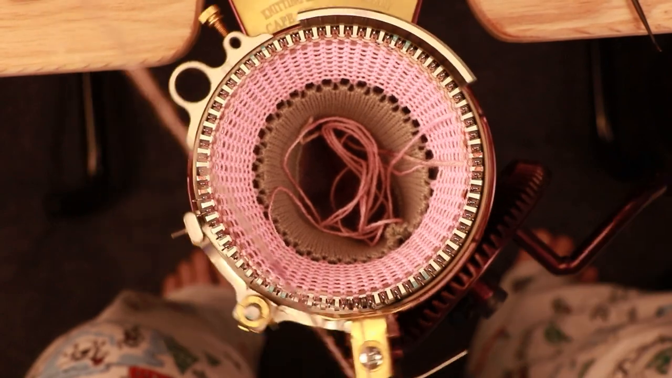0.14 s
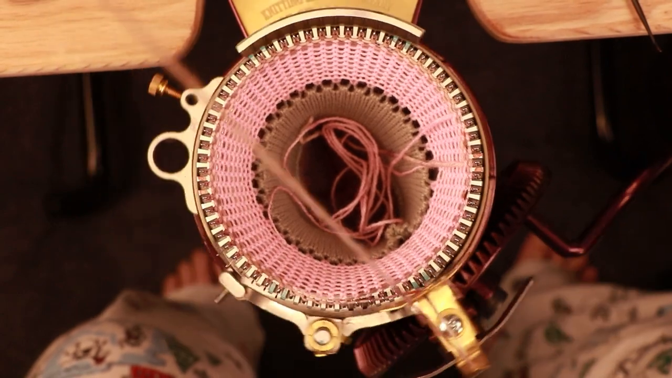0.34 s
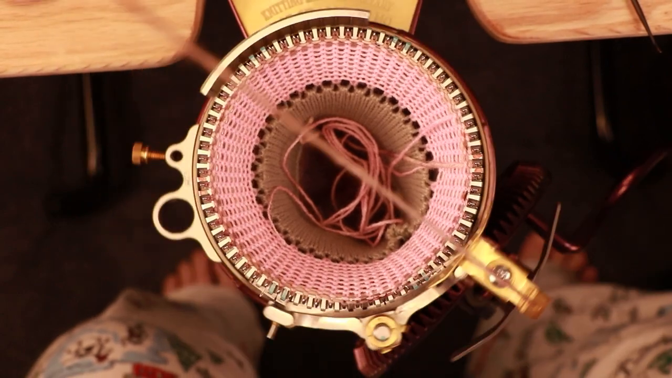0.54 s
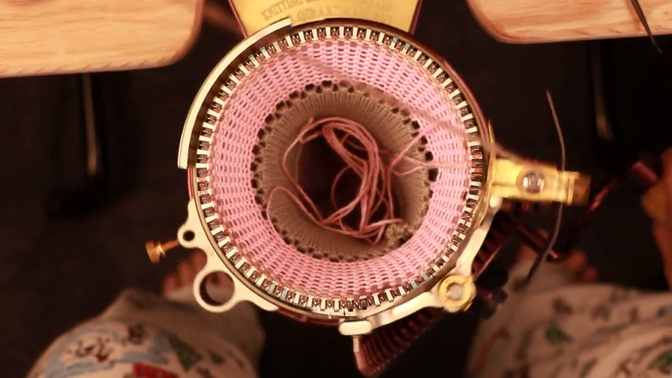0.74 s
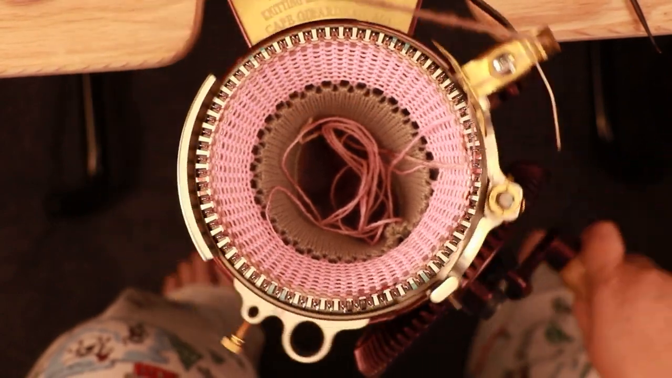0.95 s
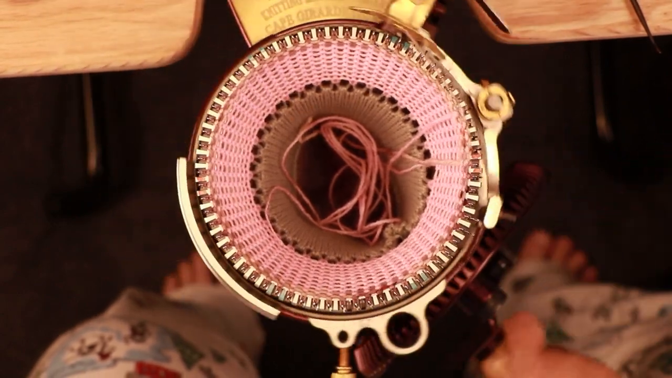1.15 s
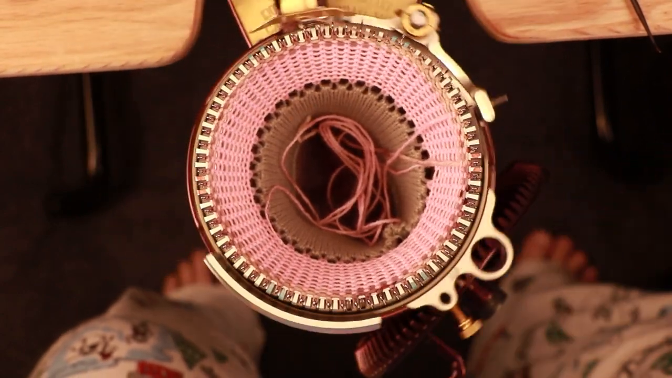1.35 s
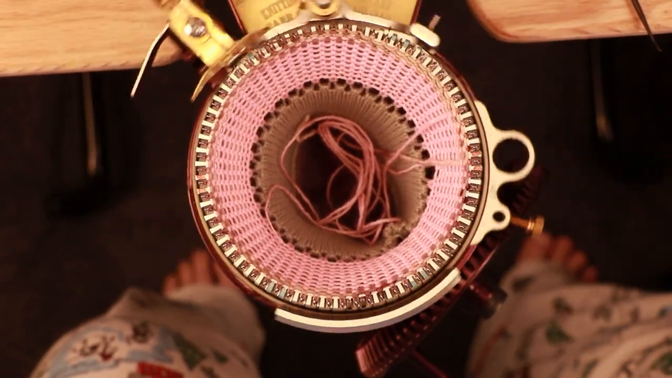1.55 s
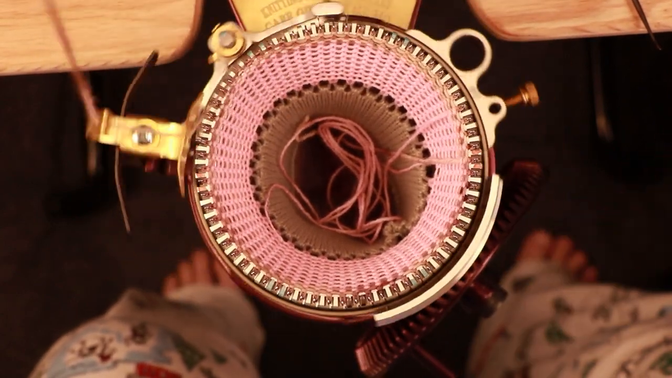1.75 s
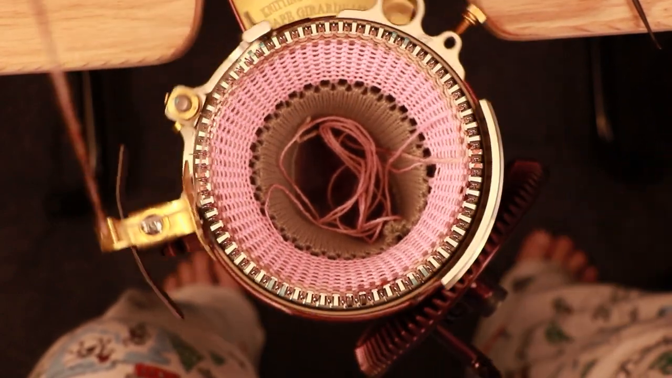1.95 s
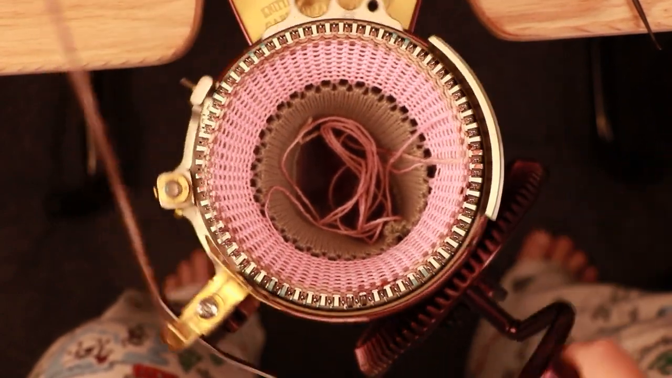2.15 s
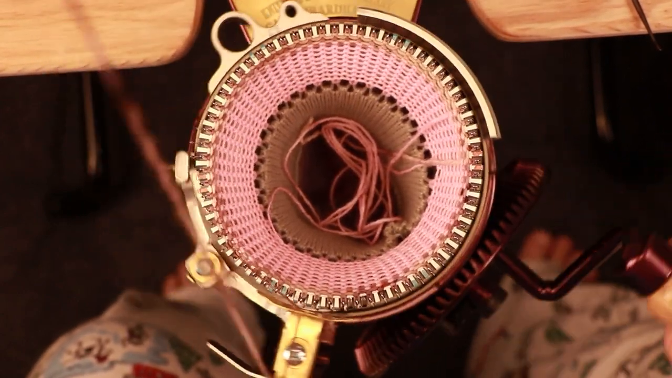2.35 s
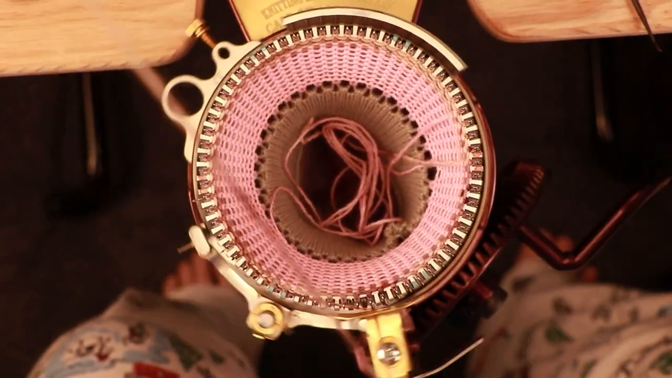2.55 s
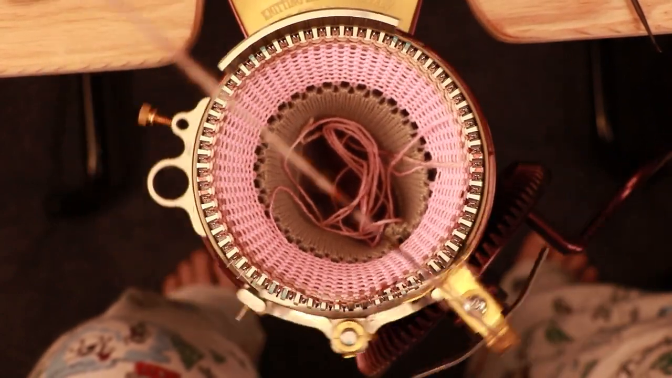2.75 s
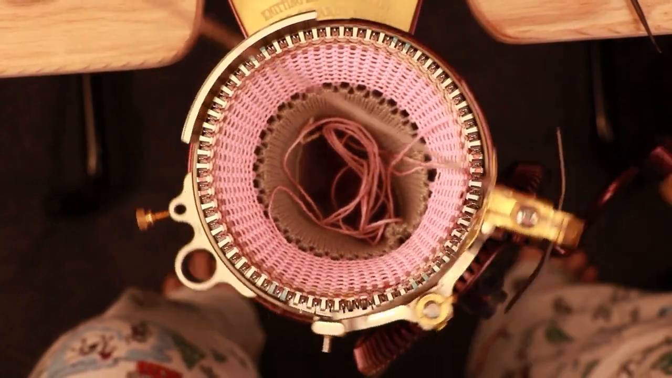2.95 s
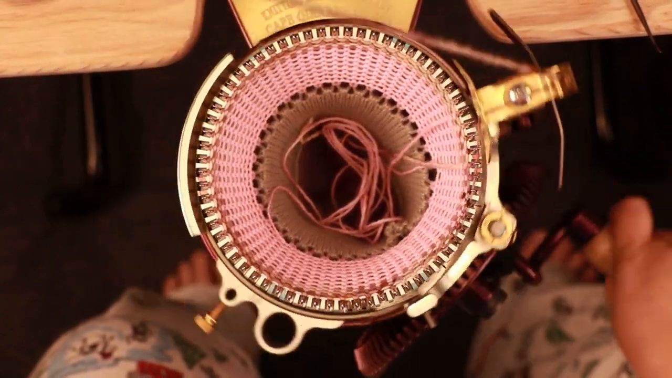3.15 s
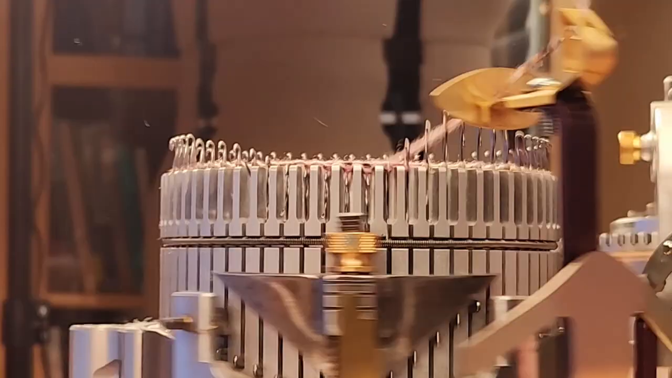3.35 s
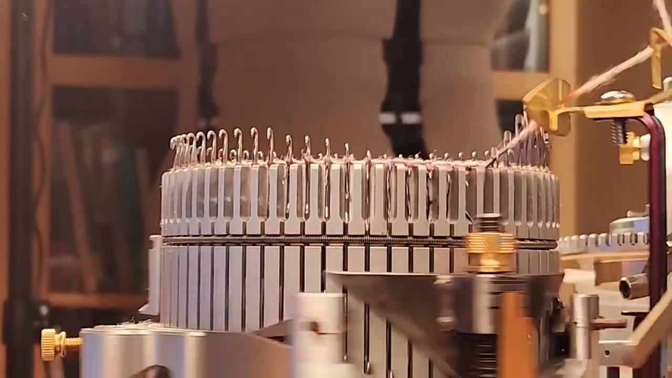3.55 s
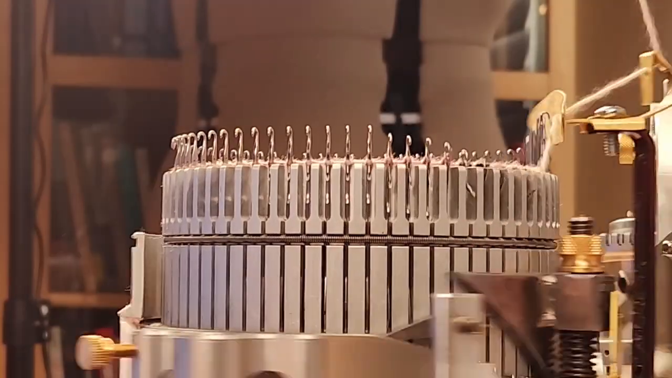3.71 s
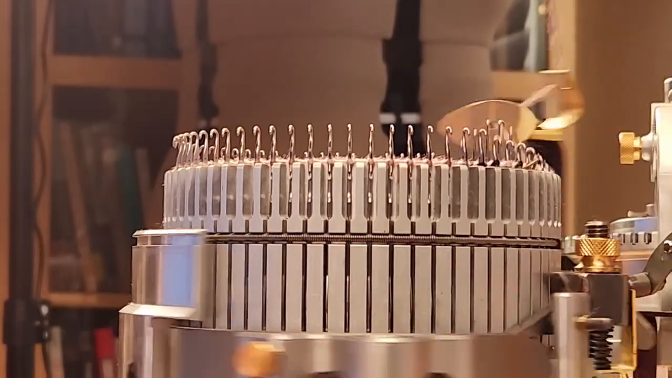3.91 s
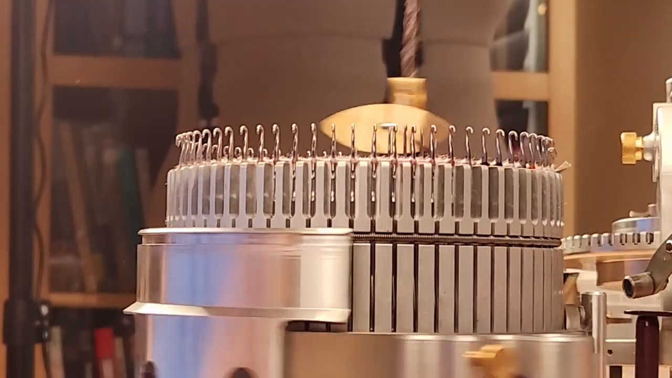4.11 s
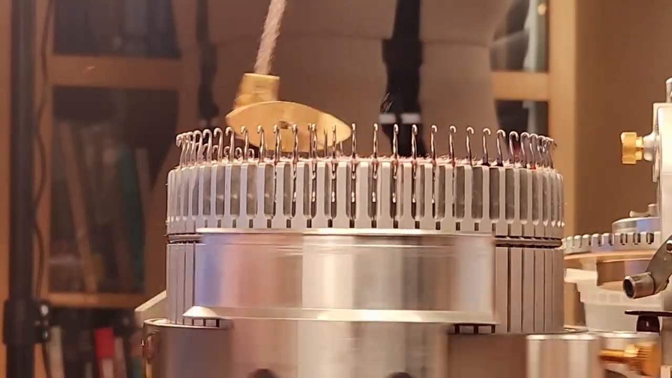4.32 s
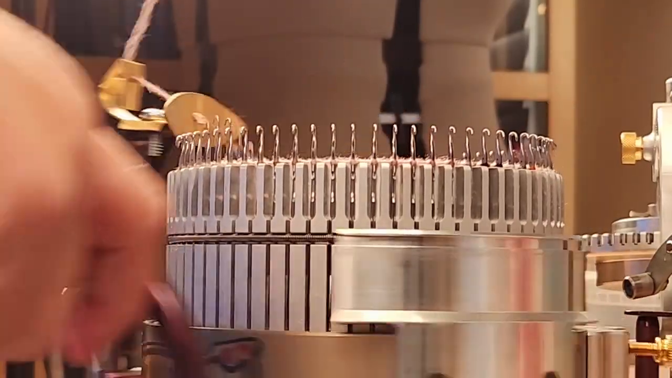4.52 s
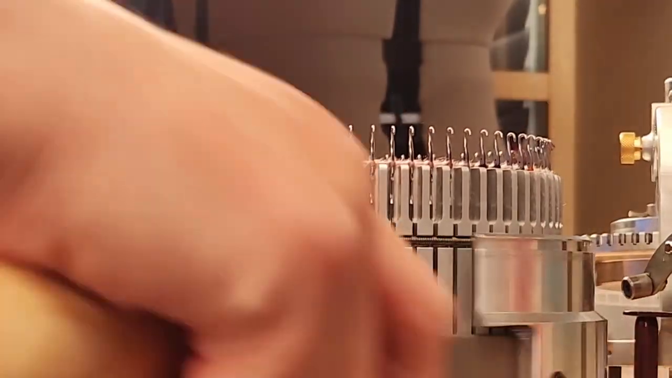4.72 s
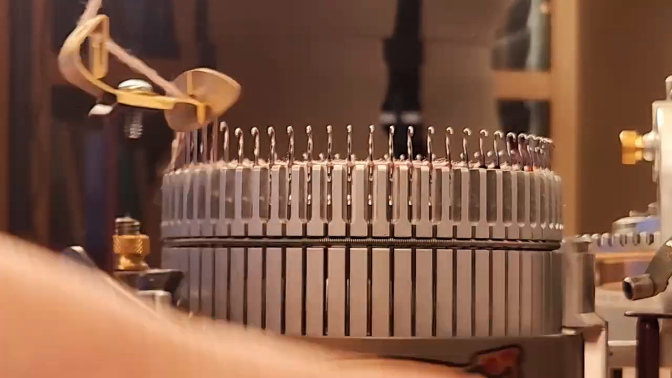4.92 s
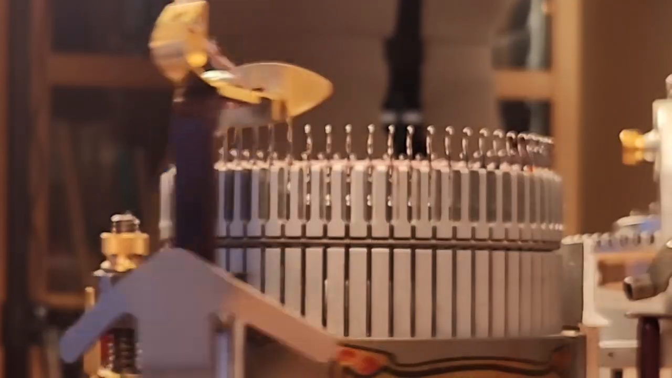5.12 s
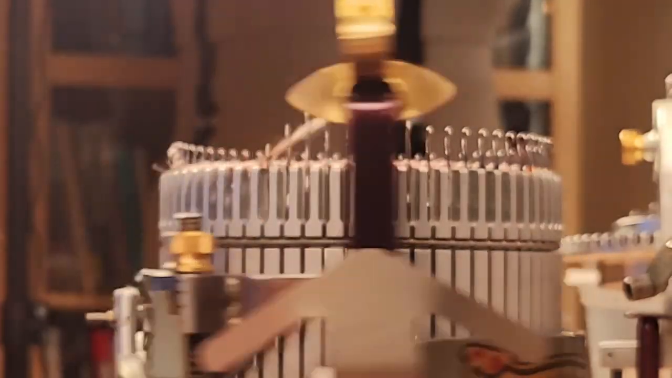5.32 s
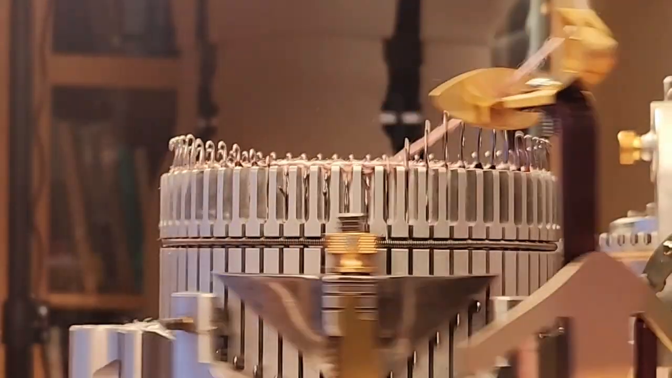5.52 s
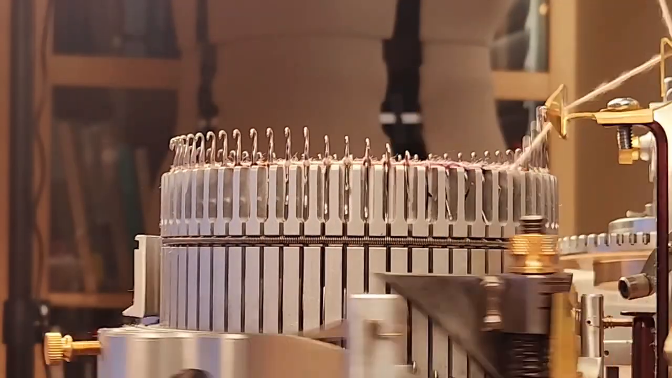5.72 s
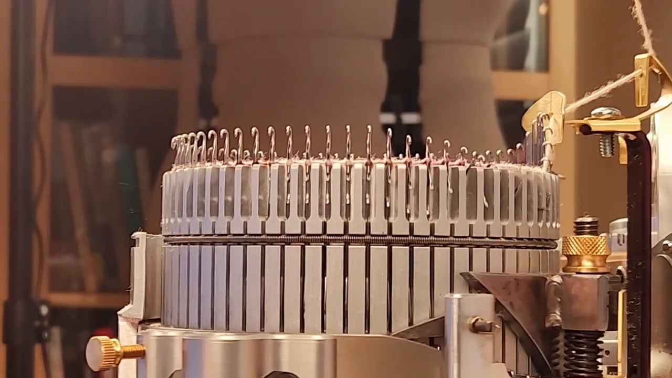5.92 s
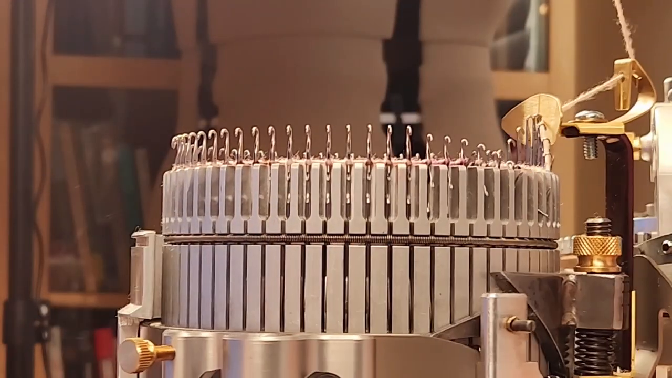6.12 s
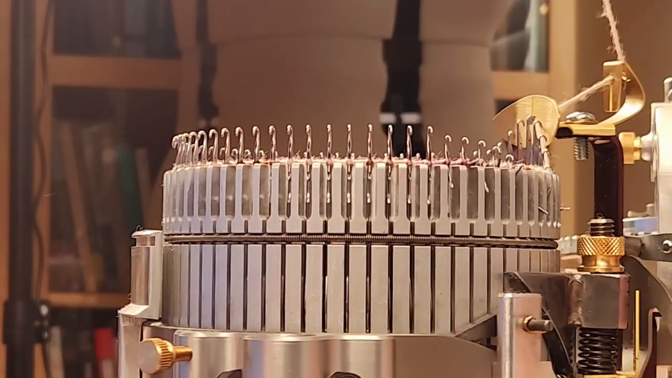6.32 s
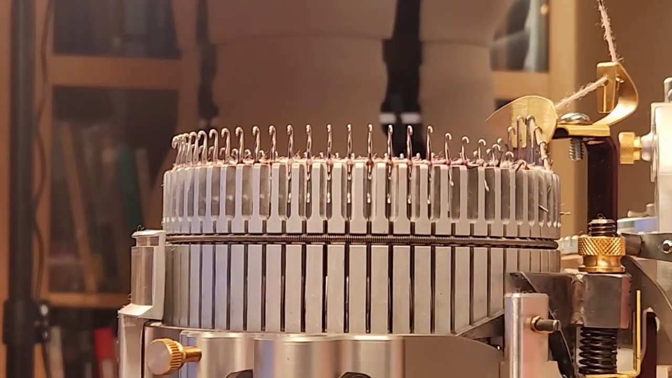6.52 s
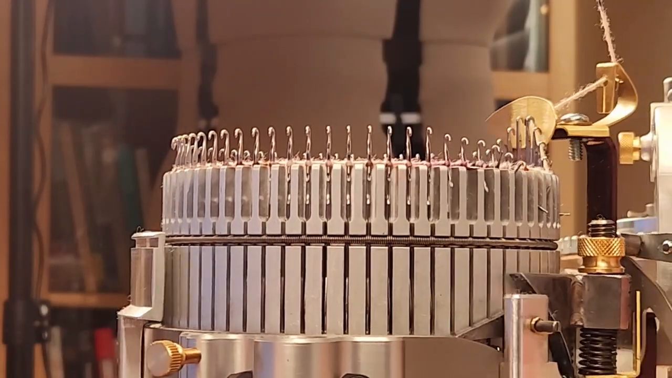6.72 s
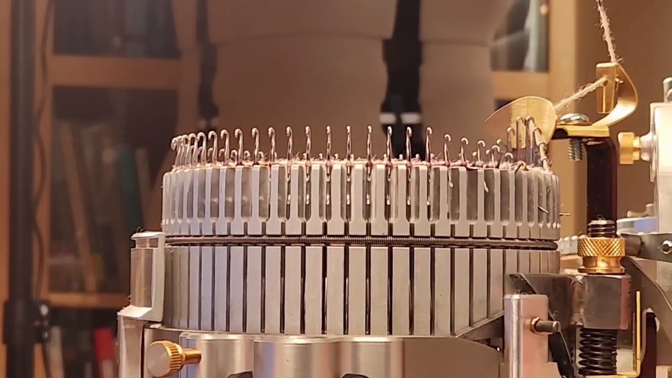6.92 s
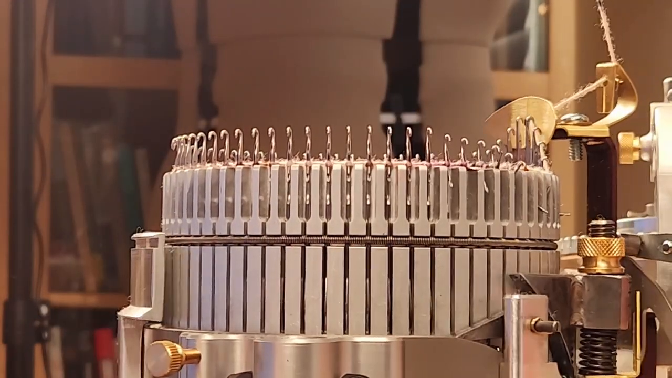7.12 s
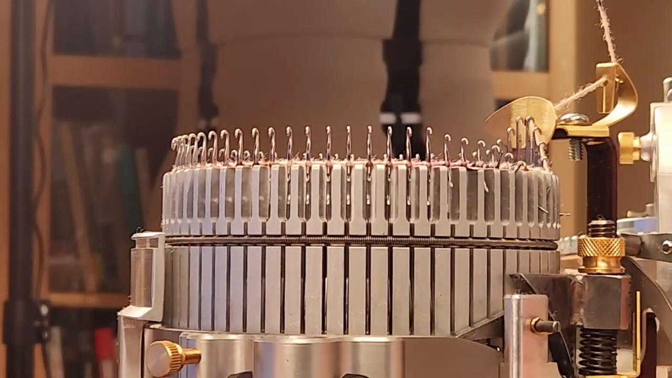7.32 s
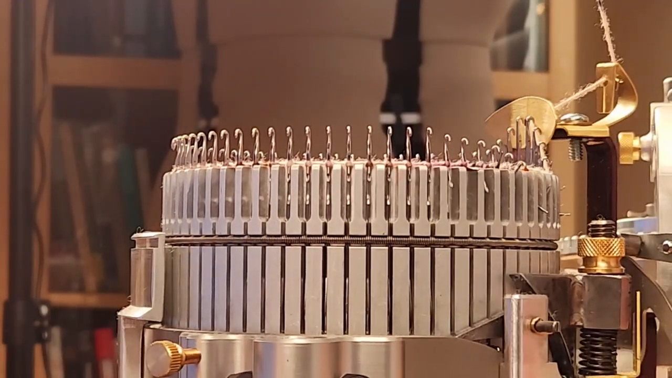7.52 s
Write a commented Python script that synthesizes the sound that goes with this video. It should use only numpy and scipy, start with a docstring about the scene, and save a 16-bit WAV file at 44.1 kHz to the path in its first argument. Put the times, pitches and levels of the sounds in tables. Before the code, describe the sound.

Steel needles snap and tick in a fast, slightly uneven stream as a knitting machine is cranked by hand, heard up close in a small room. Light metal sliding and a soft gear rumble run underneath, with an occasional dry knock and short scrape. Near the end the cranking stops, the last needles drop one by one, and only the faint, steady hum of a fan remains.

```python
"""A quick, uneven clatter of steel needles: a hand-cranked sock knitting machine, close by in a small room.
A cam (a shaped ramp) drives one needle after another: a snap, a rebound, then a lighter latch tick.
Needles slide in their slots, the crank gear grumbles and the cam ring knocks once a turn.
After six seconds the machine comes to rest, while a fan hums on behind it."""
import sys
import numpy as np
from scipy import signal
from scipy.fft import rfft, irfft
from scipy.io import wavfile
from scipy.ndimage import uniform_filter1d

SR = 44100
rng = np.random.default_rng(int(sys.argv[2]) if len(sys.argv) > 2 else 0)


def digitize_waveform(pressure):
    """Quantize a signal to 16-bit integers and store it at the path in sys.argv[1].

    Rows of a 2-D input are taken as channels; values are limited to [-1, 1].
    """
    field = np.atleast_2d(pressure).T
    bounded = np.clip(field, -1, 1)
    quanta = np.round(bounded * 32767).astype(np.int16)
    wavfile.write(sys.argv[1], SR, quanta)


N = 333396
NEEDLES, USUAL_PACE = 64, 30  # needles round the cylinder, needles a second


def stitches(s, db, low_db, edge_db, rebound_db, contact_hz=6400, contact_decay_s=.00007, soft=0.35):
    """A needle scuffs onto the cam, snaps against its slot, chatters and rebounds a few ms later."""
    count = len(s)
    late, stiff = rng.standard_normal((count, 2)).T[:, :, None]
    flight_s = np.clip(.0038 + .0005 * late, .002, .007)
    t = np.arange(2048) / SR
    # the first hard contact is one short, bright cycle; the softer chatter carries the low ring
    cycle = np.exp(-t / contact_decay_s) * np.sin(2 * np.pi * contact_hz * (1 + 0.086 * stiff) * t)
    contact = unit(np.diff(cycle, prepend=0))
    dull = lambda x: unit(signal.lfilter([1, soft], [1], x))
    snap = amp(-5.5) * contact + amp(-6.5) * chatter(0, 0.0002, count)
    snap += dull(chatter(.0003, 0.0026, count, alike=3))
    rebound = dull(amp(-17.5) * chatter(flight_s, .0003, count) + chatter(flight_s, .003, count, alike=3))
    blows = unit(snap) + amp(rebound_db - 3.5) * rebound
    snaps = ring_needles(s, blows, db, low_db, edge_db, unlike_db=0.9)
    # while the crank turns, a scuff (chatter played backwards) swells up to each snap
    moving = s[:, 0] < CRANK_PACE[-1][0]
    swells = np.roll(chatter(0, .003, moving.sum())[:, ::-1], shift=1024, axis=1)
    scuffs = ring_needles(s[moving] - 1024 / SR, swells, db[moving] - 20.0, low_db=-9.0, edge_db=-7.0)
    return snaps + scuffs


# how hard the needles snap round the cylinder: needle number, level/dB
SNAP_FORCE = [(0, -39.5), (1, -42.7), (4, -40.5), (9, -41.5), (12, -37), (15, -40.5), (28, -37), (29, -40),
              (34, -38), (37, -40.5), (43, -38.3), (44, -43.5), (49, -39), (54, -40), (56, -43.5),
              (58, -38.5)]
# more or less of their low ring: needle number, level/dB
LOW_RING_LIFT = [(0, -1), (9, 2), (19, -2), (20, 2.5), (30, -0.5), (35, -4), (47, -0.5), (49, 0), (54, 3)]
# more or less of their bright edge: needle number, level/dB
BRIGHT_EDGE_LIFT = [(2, 3), (5, -0.5), (12, -2), (24, 1.5), (33, -2.5), (42, 3), (48, 0.5), (50, 6),
                    (58, -0.5)]
# stronger or weaker rebounds: needle number, level/dB
REBOUND_LIFT = [(2, -0.5), (7, -6.5), (11, -1.5), (28, -8), (41, -2.5), (42, -7), (58, -3)]
# the crank is eased to rest and the last needles drop one by one: t/s, level/dB
LAST_DROPS = [(5.9245, -40), (6.0379, -42), (6.2695, -39)]


def snaps_in_turn():
    """When and how each needle snaps. The cylinder is not quite even, so every turn repeats a pattern."""
    t = np.arange(0, CRANK_PACE[-1][0], 1 / SR)
    passed = travel(t)
    cranked_s = np.interp(np.arange(int(passed[-1]) + 1), passed, t)
    last_s, last_db = np.transpose(LAST_DROPS)
    s = np.r_[cranked_s, last_s]
    db = np.r_[round_cylinder(SNAP_FORCE, spread_db=.8, count=len(cranked_s)), last_db]
    low_db = round_cylinder(LOW_RING_LIFT, spread_db=1.17, count=len(s))
    edge_db = round_cylinder(BRIGHT_EDGE_LIFT, spread_db=2.05, count=len(s))
    rebound_db = round_cylinder(REBOUND_LIFT, spread_db=2.1, count=len(s))
    return np.array([s, db, low_db, edge_db, rebound_db])[:, :, None]


def round_cylinder(curve, spread_db, count):
    """Decibels for one needle after another: a curve round the cylinder plus each needle's own quirk."""
    needle = np.arange(count) % NEEDLES
    quirk_db = spread_db * rng.standard_normal(NEEDLES)
    return np.interp(needle, *np.transpose(curve), period=NEEDLES) + quirk_db[needle]


# how fast the hand cranks: t/s, pace/(needles a second)
CRANK_PACE = [(0.0, 20.76), (0.36, 23.71), (0.552, 16.18), (0.946, 33.11), (1.237, 27.92), (1.374, 37.62),
              (1.495, 28.06), (1.814, 34.11), (1.96, 22.0), (2.264, 28.35), (2.459, 23.66), (2.802, 26.32),
              (2.917, 24.62), (3.143, 33.38), (3.334, 27.56), (3.643, 33.62), (3.691, 29.64),
              (4.104, 33.72), (4.197, 26.63), (4.481, 34.67), (4.632, 27.45), (4.689, 29.33),
              (5.007, 19.57), (5.253, 33.96), (5.495, 32.43), (5.624, 37.77), (5.81, 19.38)]


def pace(t):
    """How many needles a second the cam passes at time t."""
    return np.interp(t, *np.transpose(CRANK_PACE))


def travel(t, first_snap_s=.0266):
    """How many needles the cam has passed since the first snap."""
    clock, step = np.linspace(0, CRANK_PACE[-1][0], 6000, retstep=True)
    passed = np.cumsum(pace(clock)) * step
    return np.interp(t, clock, passed) - np.interp(first_snap_s, clock, passed)


def nearness(t, needle, focus):
    """1 as the cam passes a given needle, near 0 on the far side of the cylinder."""
    return np.exp(focus * (np.cos(2 * np.pi * (travel(t) - needle) / NEEDLES) - 1))


# tone (strength from bass to treble) of a needle snapping in its slot: f/Hz, level/dB
SNAP_TONE = [(100, -34), (600, -19.5), (1100, -17), (1700, -10), (2300, -4), (3300, -2), (5000, -4),
             (7000, -0.5), (8300, -4.5), (8950, -6.5), (10000, -3.5), (11500, -5), (13500, -6.5),
             (16000, -6.5)]


def ring_needles(s, blows, db, low_db=0, edge_db=0, unlike_db=2.0):
    """Blows at times s each ring their own needle and the cylinder; db is the level as if 10 ms long."""
    count, size = blows.shape
    hz = np.fft.rfftfreq(size, 1 / SR)
    ripple = uniform_filter1d(rng.standard_normal((count, len(hz))), size=12, axis=1)
    own_tone = evened(uniform_filter1d(ripple, size=8, axis=1))
    low = 1 / (1 + (hz / 5200) ** 8)
    edge = 1 - 1 / (1 + (hz / 9000) ** 10)
    gain = amp(read(SNAP_TONE, hz) + steel(s, hz) + unlike_db * own_tone + low * low_db + edge * edge_db)
    # the metal rings only after it is struck (minimum phase)
    log_gain = np.log(np.hstack([gain, gain[:, -2:0:-1]]))
    body = np.exp(np.conj(signal.hilbert(log_gain)))[:, :len(hz)]
    rings = unit(irfft(rfft(blows) * body))
    return placed(s[:, 0], rings * amp(db) * np.sqrt(SR / 100))


# pitches at which needles and cylinder ring:
# f/Hz, width/Hz, steady lift/dB, extra lift at the liveliest spot/dB, needle number of that spot
STEEL_PEAKS = [(2440, 180, 1, 13, 12), (2674, 400, 2.5, 2.5, 24), (3243, 220, 3.5, 6, 60),
               (3920, 400, -1, 7, 46), (4470, 330, 3, 4.5, 7), (5510, 160, 6, 5, 26),
               (5800, 450, -0.5, 4.5, 12), (6750, 350, 4.5, 5, 34), (7360, 600, 0, 8, 39),
               (8350, 300, 4, 10, 57), (8530, 380, 3, 6.5, 4), (9650, 320, 0.5, 4, 52),
               (10110, 790, 3, 3.5, 2), (11540, 470, 4, 2.5, 26), (12800, 500, 1, 3, 26),
               (14700, 1500, -1, 7, 31)]


def steel(t, hz, focus=11.0):
    """Decibels of ringing in the steel: each pitch swells as the cam passes its liveliest spot."""
    peaks = [(f, width, db + extra * nearness(t, spot, focus))
             for f, width, db, extra, spot in STEEL_PEAKS]
    return lifts(peaks, hz)


def latches(s, db):
    """About midway between two snaps a latch flicks shut, harder when the crank turns faster."""
    gap_s = np.diff(s, axis=0)
    late, loud = rng.standard_normal((len(gap_s), 2)).T[:, :, None]
    level_db = db[:-1] - 14.5 + 1.6 * loud - 18.0 * np.log10(gap_s / np.median(gap_s))
    when = s[:-1] + np.minimum(gap_s, .075) * (.51 + .035 * late)
    return ring_needles(when, chatter(0, 0.002, len(gap_s)), level_db, low_db=1.0, edge_db=5.0)


# needles that catch and click out of turn: t/s, level/dB
STRAY_CLICKS = [(0.3382, -54), (1.384, -44.5), (1.4055, -55), (1.5645, -43), (1.5735, -46.5),
                (3.6554, -42.5), (3.8414, -41.5), (3.905, -56), (5.8, -49), (5.987, -61), (6.151, -66),
                (6.23, -70)]


def catches(decay_s=0.0073):
    """Stray needles let go with a rough click."""
    s, db = np.transpose(STRAY_CLICKS)[:, :, None]
    return ring_needles(s, chatter(0, decay_s, len(s)), db, low_db=5.0, edge_db=6.0)


# tone of needles sliding in their slots: f/Hz, level/dB
SLIDE_TONE = [(700, -20.5), (1300, -6), (2000, -0.5), (2800, 2), (3800, -2), (5000, -5), (7000, -5),
              (9000, -18.5), (12000, -12), (16000, -12.5)]


def sliding(level_db=-54.0, sag_db=6.0, slips_per_s=7000, spread_db=2.2):
    """Steel slides on steel in a fine grain of slips, easing off before each snap."""
    slips = (rng.random(N) < slips_per_s / SR) * rng.standard_normal(N)
    slips *= amp(spread_db * np.minimum(rng.exponential(1, N), 4))
    hz, t, spectrum = signal.stft(slips, SR, nperseg=512)
    hz = hz[:, None]
    # a needle pressed against its slot rings less than when it snaps free
    hiss = signal.istft(spectrum * amp(read(SLIDE_TONE, hz) + .5 * steel(t, hz)), SR)[1][:N]
    stroke = travel(np.arange(N) / SR) % 1
    easing = amp(level_db - sag_db * (stroke - .5))
    return easing * running(db_per_doubling=9.5, waver_db=1.03, stop_s=0.036) * evened(hiss)


# the cam ring knocks once a turn: t/s, level/dB
RING_KNOCKS = [(1.457, -46), (3.7400, -47.5), (6.1136, -48.5)]
# the pitches in its clank: f/Hz, level/dB, time to fade by 60 dB/s
CLANK_PITCHES = [(874, -2.5, 0.065), (1430, 1, 0.022), (1493, 1.5, 0.0223), (1694, 0.5, 0.03),
                 (2090, -4, 0.02), (2720, 5, 0.026), (3550, -5, 0.025)]
# it scrapes soon after the first two knocks: middle t/s, length/s, level/dB
RING_SCRAPES = [(1.574, 0.076, -48), (3.852, 0.05, -45)]
# tone of that scrape: f/Hz, level/dB
SCRAPE_TONE = [(300, -25.5), (620, 2.5), (800, -5.5), (1150, 1.5), (1800, -7), (3000, -14), (8000, -1),
               (16000, -14.5)]


def cam_ring(crack_db=2.0):
    """The loose ring knocks with a dry, rattling clank, then drags over its seat."""
    s, db = np.transpose(RING_KNOCKS)[:, :, None]
    t = np.arange(SR // 10) / SR
    ringing = sum(amp(level - 60 * t / fade_s) * np.sin(2 * np.pi * hz * t)
                  for hz, level, fade_s in CLANK_PITCHES)
    rattle = chatter(0, 0.00014, len(s)) + amp(-1.5) * chatter(0.0018, 0.0098, len(s))
    clanks = unit(signal.fftconvolve(rattle, ringing[None], axes=1)) * amp(db) * np.sqrt(SR / 100)
    cracks = ring_needles(s, chatter(0, .004, len(s)), db + crack_db, low_db=-5.0, edge_db=-0.5)
    return placed(s[:, 0], clanks) + cracks + rubs(RING_SCRAPES, SCRAPE_TONE)


# tone of the gear's grumble: f/Hz, level/dB
GRUMBLE_TONE = [(30, -19.5), (70, -11.5), (150, 1.5), (300, -11), (550, 1), (800, -4), (1100, -4.5),
                (1600, -11.5), (3000, -27.5)]
# the gear groans briefly under load: middle t/s, length/s, level/dB
GEAR_GROANS = [(3.47, 0.087, -57), (5.5, 0.068, -72)]
# tone of a groan: f/Hz, level/dB
GROAN_TONE = [(250, -31), (430, -11.5), (520, 5.5), (650, -4), (900, -23), (2000, -43.5)]


def gear(level_db=-64.0, stiff_db=1.5, stiff_needle=25, focus=30.0):
    """The crank gear grumbles under the clatter, a little harder at one stiff spot in each turn."""
    load = amp(level_db + stiff_db * nearness(np.arange(N) / SR, stiff_needle, focus))
    grumble = load * running(db_per_doubling=4.0, waver_db=2.0, stop_s=.045) * noise(GRUMBLE_TONE)
    return grumble + rubs(GEAR_GROANS, GROAN_TONE)


def room(x, paths=5):
    """Each needle stands at another spot, so one snap after another takes a new path round the room."""
    path = np.round(travel(np.arange(N) / SR)) % paths
    return sum(echo(x * (path == k)) for k in range(paths))


# how long the room rings: f/Hz, time to fade by 60 dB/s
ROOM_FADE = [(300, .35), (1500, 0.25), (4000, 0.31), (7000, 0.24), (11000, 0.17), (16000, 0.19)]
# tone of what the walls give back: f/Hz, level/dB
WALL_TONE = [(300, 2.5), (1500, 3.5), (2500, 1), (7000, -2.5), (10000, -1), (13000, -5.5), (16000, -7)]


def echo(x, first_s=0.0063, bounces_per_s=4000):
    """Sound bounces off the walls, each pitch dying away at its own speed."""
    size = SR // 2
    bounces = rng.standard_normal(size) * (rng.random(size) < bounces_per_s / SR)
    bounces *= np.arange(size) > first_s * SR
    hz, t, spectrum = signal.stft(bounces, SR, nperseg=256)
    hz = hz[:, None]
    fade = amp(read(WALL_TONE, hz) - 60 * t / read(ROOM_FADE, hz))
    tail = signal.istft(spectrum * fade, SR, nperseg=256)[1]
    return signal.fftconvolve(x, unit(tail))[:N]


# tone of the fan's rushing air: f/Hz, level/dB
AIR_TONE = [(20, -23), (45, -10), (66, -4), (90, -4), (130, -1.5), (200, 3), (245, -5.5), (400, -2),
            (560, -10), (850, -11.5), (1100, -17.5), (1500, -18.5), (3500, -36.5), (8000, -40.5),
            (16000, -48)]
# the pitches that hum in it: f/Hz, width/Hz, lift/dB
FAN_HUMS = [(157, 28, 9.7), (273, 20, 3), (318, 36, 6.7), (454, 7.3, 17), (653, 7.4, 7.3), (785, 14, 2.4),
            (874, 70, 3.26), (1310, 69, 8)]


def fan(level_db=-62.5):
    """A steady rush of air with a few humming pitches."""
    return amp(level_db) * noise(AIR_TONE, FAN_HUMS)


def chatter(delay_s, decay_s, count, size=2048, alike=1):
    """Rows of tiny contacts that start after a delay and die away; `alike` rows in a run sound similar."""
    t = np.arange(size) / SR - delay_s
    contacts = uniform_filter1d(rng.standard_normal((count, size)), size=alike, axis=0)
    return unit(contacts * (t >= 0) * np.exp(-np.maximum(t, 0) / decay_s))


def running(db_per_doubling, waver_db, stop_s):
    """Volume of a rubbing part: it grows with the pace, wavers, and dies away as the crank stops."""
    t = np.arange(N) / SR
    waver = np.interp(travel(t), np.arange(3 * NEEDLES), rng.standard_normal(3 * NEEDLES))
    db = db_per_doubling * np.log2(pace(t) / USUAL_PACE) + waver_db * waver
    return amp(db) * np.exp(-np.maximum(t - CRANK_PACE[-1][0], 0) / stop_s)


def rubs(rows, tone):
    """Short swells of rubbing noise."""
    t = np.arange(N) / SR
    swell = sum(amp(db) * np.exp(-(2 * (t - middle) / length) ** 2) for middle, length, db in rows)
    return swell * noise(tone)


def noise(tone, peaks=()):
    """Steady noise with the given tone, at an average strength of 1."""
    hz = np.fft.rfftfreq(N, 1 / SR)
    gain = amp(read(tone, hz) + lifts(peaks, hz))
    return evened(irfft(rfft(rng.standard_normal(N)) * gain, N))


def placed(times, sounds):
    """Lays sounds out at their times."""
    out = np.zeros(N + SR)
    for s, sound in zip(times, sounds):
        start = max(round(s * SR), 0)
        out[start:start + len(sound)] += sound
    return out[:N]


def read(points, hz):
    """Reads between the rows of a frequency table, giving each octave equal room."""
    f, value = np.transpose(points)
    return np.interp(np.log(hz + 1), np.log(f), value)


def lifts(peaks, hz):
    """Decibels that ringing pitches add to a tone."""
    return sum(db / (1 + (2 * (hz - f) / width) ** 2) for f, width, db in peaks)


def amp(db):
    """Turns decibels into a volume factor."""
    return 10 ** (np.asarray(db) / 20)


def evened(x):
    """Scales to an average strength (rms) of 1."""
    return x / np.sqrt(np.mean(x ** 2) + 1e-20)


def unit(x):
    """Scales each row to energy 1."""
    return x / np.sqrt(np.sum(x ** 2, -1, keepdims=True) + 1e-20)


def scene():
    """The machine close up, its echo in the room, and the fan."""
    s, db, low_db, edge_db, rebound_db = snaps_in_turn()
    clatter = stitches(s, db, low_db, edge_db, rebound_db) + latches(s, db) + catches()
    machine = clatter + sliding() + gear() + cam_ring()
    return (machine + amp(-14.0) * room(machine) + fan())[None]


def record(dry):
    """Cuts the highest treble, above 15900 Hz."""
    treble_cut = signal.firwin(511, 15900, window=("kaiser", 9), fs=SR)
    return signal.oaconvolve(dry, treble_cut[None], "same")


dry = scene()
out = record(dry)
digitize_waveform(out)
```